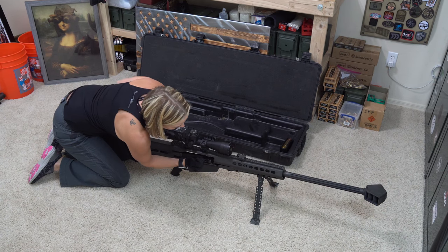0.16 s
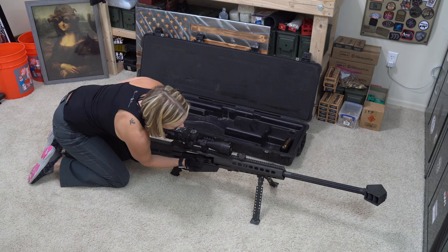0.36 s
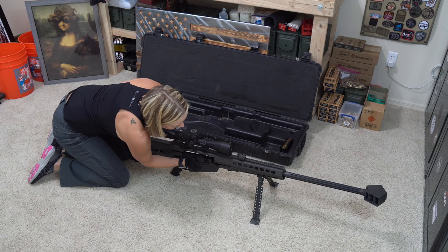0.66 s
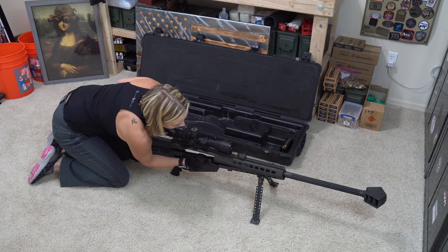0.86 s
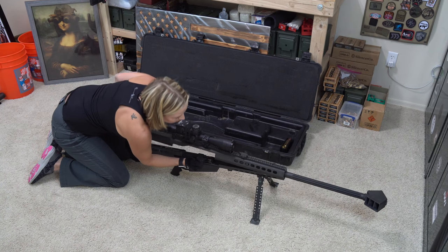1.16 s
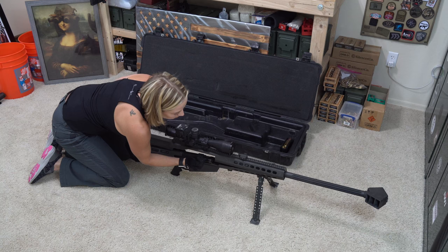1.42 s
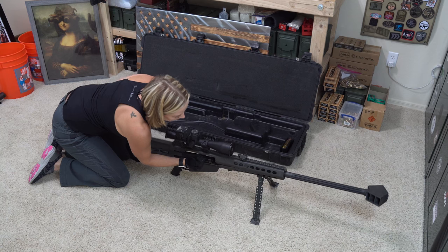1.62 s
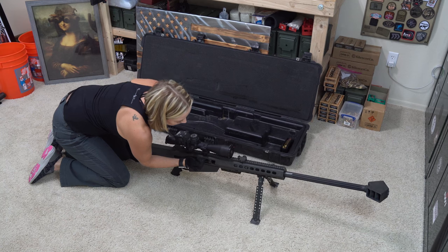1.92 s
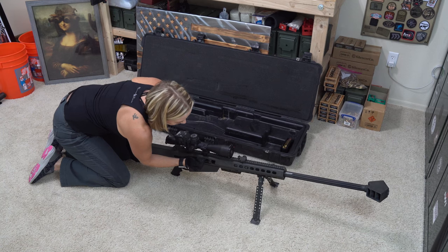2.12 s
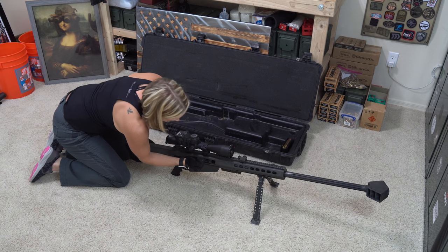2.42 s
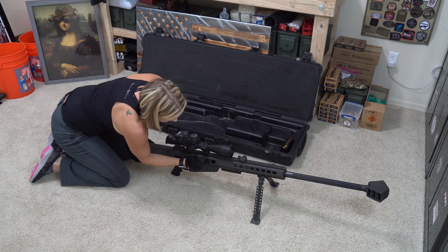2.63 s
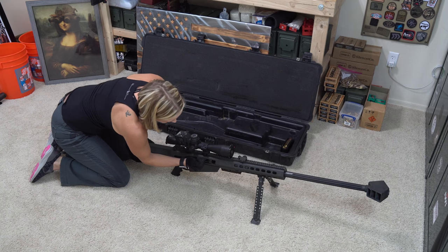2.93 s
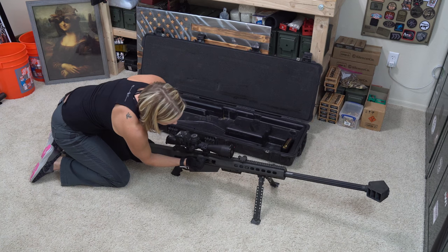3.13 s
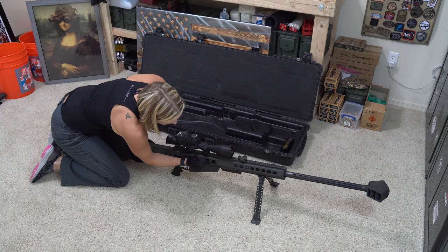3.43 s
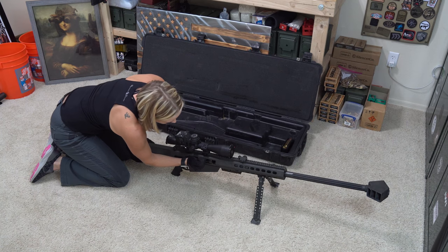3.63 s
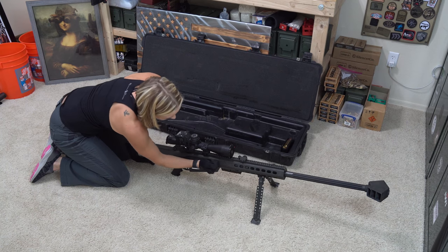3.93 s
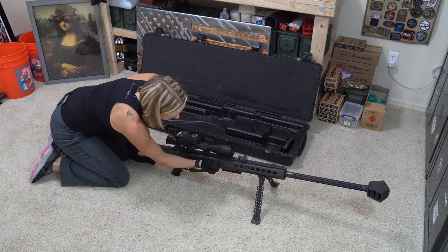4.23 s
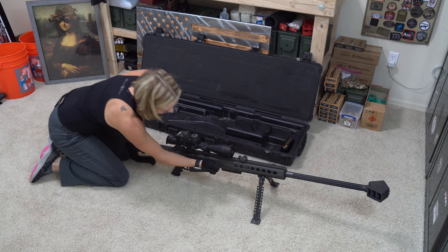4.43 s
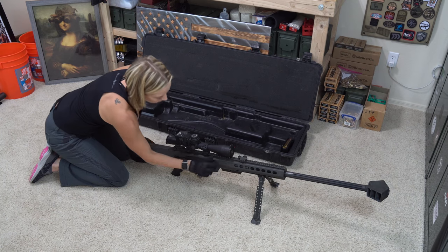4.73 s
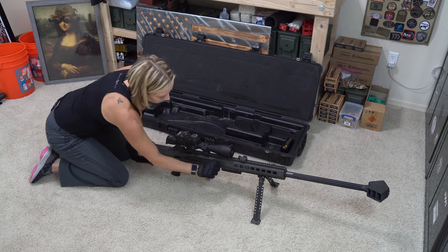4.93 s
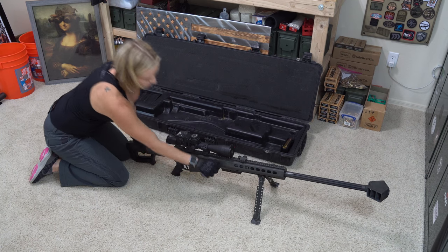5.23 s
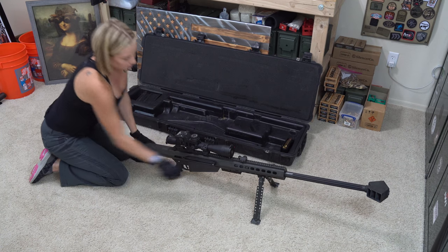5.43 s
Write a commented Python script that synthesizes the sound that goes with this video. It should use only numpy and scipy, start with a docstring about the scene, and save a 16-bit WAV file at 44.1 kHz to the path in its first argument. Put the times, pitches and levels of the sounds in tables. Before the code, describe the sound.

In a small carpeted room, a large rifle's bolt clatters, is hauled back with a hard clack, then slams home with bright ringing steel.

```python
"""A small storeroom with a carpet, where the bolt of a large rifle is worked.
Steel parts knock, slide and latch: bursts of tiny impacts excite short cracks and a decaying room wash.
The bolt is hauled back against its stop, then slams home; damped modes make the receiver ring.
Clothes rustle between the blows as swells of filtered noise, over a steady hiss.
The recorder's gain control ducks under the loud blows and recovers in two stages."""
import sys
import numpy as np
from scipy import signal
from scipy.io import wavfile
from scipy.ndimage import uniform_filter1d, minimum_filter1d

SR = 44100
rng = np.random.default_rng(int(sys.argv[2]) if len(sys.argv) > 2 else 0)


def digitize_waveform(pressure):
    """Quantize a signal to 16-bit integers and store it at the path in sys.argv[1].

    Rows of a 2-D input are taken as channels; values are limited to [-1, 1].
    """
    field = np.atleast_2d(pressure).T
    bounded = np.clip(field, -1, 1)
    quanta = np.round(bounded * 32767).astype(np.int16)
    wavfile.write(sys.argv[1], SR, quanta)


N = 245362

# spectral density of a blow on the receiver: (f/Hz, relative density/dB per Hz)
BLOW_SPECTRUM = [(40, -44.5), (90, -28), (130, -22), (170, -19.5), (260, -5), (350, -4), (550, -9),
                 (900, -10), (1600, -4.5), (2400, -5.5), (4000, -7.5), (7000, -11.5), (11000, -16),
                 (16000, -23)]
# damped resonances of the receiver's sheet steel: (f/Hz, bandwidth/Hz, emphasis/dB)
SHELL_RESONANCES = [(728, 130, 5.5), (1010, 60, 6), (1410, 89, 1), (1564, 45, 2.5), (1773, 230, 7.5),
                    (1997, 130, 3), (2611, 50, 2.5), (3116, 47, 4), (3356, 39, 4.5), (3670, 30, -3)]
# ringing modes of bolt, spring and barrel: (f/Hz, level/dB, t60/s)
STEEL_MODES = [(931, -45, 1.7), (1120, -45, 1.6), (1464, -37, 1.7), (1771, -28, 1.8), (1976, -29, 1.3),
               (2030, -7, .63), (2052, -7, .63), (2105, -26, 1.1), (2175, -32, 1.5), (3160, -13, .56),
               (3316, -32, 1.0), (4215, -41, 1.8), (3919, -16, .55), (4307, -20, .58), (4490, -11, .54),
               (6907, -14, .48), (7079, -14, .41), (7318, -13, .43), (8107, -15, .41), (8375, -5, .46),
               (9275, -11, .38), (9825, 1, .32), (10131, -13, .36), (10470, -2, .28), (10729, 0, .31),
               (11294, -8, .3), (11391, -13, .34), (11843, -11, .3), (12823, -12, .28), (13110, -10, .26)]
# spectral density of the many weaker modes that ring on together: (f/Hz, relative density/dB per Hz)
SHIMMER_SPECTRUM = [(300, -42.5), (900, -9), (1500, -7), (2050, 5.5), (2600, -10), (4400, -6.5),
                    (5500, -34), (12000, -45)]
# reverberation time of the room: (f/Hz, t60/s)
ROOM_T60 = [(100, 0.28), (300, .45), (700, 0.6), (1150, 0.63), (1600, 0.68), (2200, .58), (3200, 0.52),
            (5500, 0.49), (10000, 0.33), (16000, .27)]
# likeness of left and right: (f/Hz, correlation)
EAR_CORRELATION = [(150, .99), (330, .94), (800, .78), (1700, .63), (3500, .47), (7000, .28), (16000, .3)]
# steady hiss of room and microphone: (f/Hz, relative density/dB per Hz)
HISS_SPECTRUM = [(30, -42), (80, -29), (120, -18), (165, -27), (300, -15.5), (520, -7), (1000, -8.5),
                 (1900, -8.5), (3000, -12), (6000, -16), (12000, -17), (15500, -19.5)]
# spectral density of the rustle: (f/Hz, relative density/dB per Hz)
CLOTH_SPECTRUM = [(40, -19.5), (200, -9.5), (1800, 3), (5000, -3.5), (12000, -4.5), (16000, -14)]
# sleeves, gloves and knees on the carpet, one swell per shift of the body:
# (middle t/s, level/dB, half length/s)
BODY_SHIFTS = [(0.02, -58, 0.19), (0.552, -66.5, 0.46), (1.757, -59, 0.12), (2.47, -67, 0.2),
               (5.52, -64, 0.39)]
# knocks and small ticks as the rifle is handled or rocks on the floor:
# (t/s, level/dB, weight below 600 Hz/dB, brightness in the treble/dB, struck part f/Hz)
KNOCKS = [(0.0, -35, 0.5, -13.5, 790), (0.644, -48, -2.5, -26, 1900), (0.966, -59.5, 11, 3, 1940),
          (1.447, -59, -1, 4, 2580), (1.886, -23.5, -1.5, -18, 335), (2.406, -59.5, -3, 1, 1600),
          (3.518, -51, -14, -23.5, 1690), (4.244, -43, -9, -31, 2010), (4.951, -56.5, -8, -13, 779),
          (5.297, -47.5, 2.5, -9, 753)]
# the bolt slides in its rails:
# (start t/s, length/s, final level/dB, swell/dB, weight/dB, brightness/dB, f/Hz, ring/dB)
SLIDES = [(1.098, .07, -42, 21.5, -13, -4, 3100, -16), (1.335, .18, -56.5, 1, -3.5, -11.5, 2900, 0),
          (3.865, .04, -48.5, 3.5, -18.5, 7, 1750, -28.5), (3.916, .034, -19.5, 4.5, -19, -3, 790, -28.5)]
# the bolt runs into a stop and rattles:
# (t/s, level/dB, weight/dB, brightness/dB, f/Hz, first gap/s, added brightness of the first touch/dB)
STOPS = [(1.166, -37, 4, -4, 1904, .0095, -4.5), (1.825, -15.5, -4.5, -2.5, 1384, .012, 10)]
# single blows of the bolt: it breaks free, is let go, meets the breech, slams home:
# (t/s, level/dB, weight/dB, brightness/dB, f/Hz, ring/dB)
BLOWS = [(1.7707, -12, -16.5, -5.5, 1530, -13.5), (3.847, -41, -11.5, 1.5, 5400, -30),
         (3.907, -23, -18.5, -18, 1530, -24.5), (3.956, -11, -10.5, 17.5, 10500, 9)]

TIME = np.arange(N) / SR   # s
BAND_EDGES = np.geomspace(28, 17000, 26)   # Hz
BAND_CENTRES = np.sqrt(BAND_EDGES[1:] * BAND_EDGES[:-1])   # Hz

HISS_DB, STILL_CLOTH_DB = -63.5, -76   # the second is the cloth between shifts
LEFT_DB = -0.67   # the right channel is raised by as much
KNOCK_CHATTER_S, KNOCK_RING_DB = .0052, -10.5
STOP_CHATTER_S, STOP_RING_DB = .004, -6.5
BLOW_CHATTER_S = .004
EDGE_HZ, EDGE_DB = 3150, -4   # the light edge that touches a stop first
GAP_GROWTH, REBOUND_LOSS_DB, REBOUND_DULLING_DB = 1.6, 5, 1   # per rebound
STIR_S = .028   # correlation time of the reflections that stir the ringing
LIMIT_DB = -15.5   # power above which the gain is turned down
FAST_RETURN, SLOW_RETURN = 170, 3.5   # dB per s
CUTOFF_HZ = 15950


def from_db(db):
    """Logarithmic level: twenty decibels are a factor of ten in amplitude."""
    return 10 ** (np.asarray(db) / 20)


def rms(x):
    """Root mean square: the square root of the mean power."""
    return np.sqrt(np.mean(x ** 2) + 1e-20)


def at_hz(points, hz):
    """Interpolation along a logarithmic frequency axis."""
    known_hz, values = np.transpose(points)
    return np.interp(np.log(hz), np.log(known_hz), values)


def noise_bands(spectrum, size, likeness=1):
    """Interaural correlation: shared and opposed noise are mixed per band; axes (band, channel, sample)."""
    white = rng.standard_normal((2, 2, size))
    bands = []
    for k, hz in enumerate(BAND_CENTRES):
        band_pass = signal.butter(2, BAND_EDGES[k:k + 2], "band", fs=SR, output="sos")
        mid, side = signal.sosfilt(band_pass, white[k % 2])   # neighbouring bands use different noise
        alike = np.clip(likeness * at_hz(EAR_CORRELATION, hz), 0, 1)
        mid = np.sqrt(1 + alike) * mid
        side = np.sqrt(1 - alike) * side
        bands.append(from_db(at_hz(spectrum, hz)) * np.array([mid + side, mid - side]))
    return np.array(bands)


def resonance(x, hz, width_hz):
    """Damped resonance: a pole pair whose radius sets the bandwidth, with gain 1 at its peak."""
    r = np.exp(-np.pi * width_hz / SR)
    zeros = np.array([1, 0, -1]) * (1 - r * r) / 2
    poles = [1, -2 * r * np.cos(2 * np.pi * hz / SR), r * r]
    return signal.lfilter(zeros, poles, x)


def emphasise(x, hz, width_hz, db):
    """Superposition: a resonance added to its own excitation changes the level at its peak by db."""
    return x + (from_db(db) - 1) * resonance(x, hz, width_hz)


def hiss():
    """Stationary random noise: nearly independent in the two ears, as from all around."""
    noise = noise_bands(HISS_SPECTRUM, size=N, likeness=0.044).sum(axis=0)
    return from_db(HISS_DB) * noise / rms(noise)


def rustling():
    """Amplitude modulation: the gain of the cloth swells in one bell for each shift of the body."""
    gain = from_db(STILL_CLOTH_DB)
    for s, db, half_s in BODY_SHIFTS:
        gain = gain + from_db(db) * np.exp(-((TIME - s) / half_s) ** 2)
    return gain


def cloth():
    """Friction noise: broadband noise of cloth follows the movement of the body."""
    noise = noise_bands(CLOTH_SPECTRUM, size=N, likeness=0.51).sum(axis=0)
    return rustling() * noise / rms(noise)


def knocks():
    """Single impact: each knock is one contact, dull or bright by its row."""
    return [(*knock, KNOCK_CHATTER_S, KNOCK_RING_DB) for knock in KNOCKS]


def contact_colour(hz, weight_db, bright_db, low_hz=600, high_hz=4200):
    """Contact stiffness and mass: heavy contacts add bass, hard ones add treble; in dB."""
    bass_db = weight_db / (1 + (hz / low_hz) ** 2)
    treble_db = bright_db / (1 + (high_hz / hz) ** 2)
    return bass_db + treble_db


def chatter(length_s, uneven_db=5.5, touch_s=0.0034):
    """Multiple impact: a touch, then tiny random rebounds; longer ones scrape more. Energy 1."""
    t = TIME[:SR // 6]
    occurs = rng.random(len(t)) < 3000 / SR   # 3000 rebounds per s on average
    rebounds = rng.standard_normal(len(t)) * occurs
    rebounds *= from_db(uneven_db * rng.standard_normal(len(t)))
    rebounds *= np.sqrt(t) * np.exp(-t / length_s)
    force = rebounds / (np.linalg.norm(rebounds) + 1e-12)
    force[0] += touch_s / length_s
    return force / np.linalg.norm(force)


def clacks(contacts, crack_db=-1, crack_s=0.011, part_db=7, part_width=0.2):
    """Convolution of force and response: a short crack, and a room wash that dies band by band."""
    t = TIME[:SR]
    wash = from_db(-60 * t / at_hz(ROOM_T60, BAND_CENTRES)[:, None, None])
    crack = from_db(crack_db) * np.exp(-t / crack_s)
    response = noise_bands(BLOW_SPECTRUM, size=SR) * (wash + crack)
    response /= rms(response.sum(axis=0)[:, :SR // 25])   # reference: the first 40 ms
    out = np.zeros((2, N + 2 * SR))
    for s, db, weight_db, bright_db, part_hz, chatter_s, _ in contacts:
        band_db = db + contact_colour(BAND_CENTRES, weight_db, bright_db)
        coloured = np.tensordot(from_db(band_db), response, 1)
        force = emphasise(chatter(chatter_s), part_hz, part_width * part_hz, part_db)
        blow = signal.fftconvolve(coloured, force[None], axes=1)
        start = max(round(s * SR), 0)
        out[:, start:start + blow.shape[1]] += blow
    return out[:, :N]


def shell(x, plain_db=-3.0):
    """Wall resonance: the receiver's walls colour a few pitches of each clack."""
    for hz, width_hz, db in SHELL_RESONANCES:
        x = emphasise(x, hz, width_hz, db)
    return from_db(plain_db) * x


def ringing(contacts, echo_db=-1, swell_s=0.0024):
    """Modal vibration: contacts excite decaying modes, which reflections stir differently at each ear."""
    s, db, _, bright_db, _, _, ring_db = np.transpose(contacts)
    at = np.maximum(np.round(s * SR), 0).astype(int)
    out = np.zeros((2, N))
    knots = np.arange(0, 6, 1 / 120)   # times in s at which the reflections are drawn
    stir_memory = np.exp(-knots[1] / STIR_S)
    for hz, mode_db, t60 in STEEL_MODES:
        # the hardest contact wakes the high modes fully, softer ones less
        hardness_db = contact_colour(hz, 0, bright_db - bright_db.max())
        clicks = np.full(N, 1e-18)
        clicks[at] = from_db(db + ring_db + mode_db + hardness_db)
        turn = np.exp(2j * np.pi * hz / SR)
        dying = from_db(-60 / (t60 * SR)) * turn
        rising = np.exp(-1 / (swell_s * SR)) * turn
        tone = signal.lfilter([0, dying - rising], [1, -dying - rising, dying * rising], clicks)
        # modes that outlast the room stand steadier
        echo = from_db(echo_db) * min(at_hz(ROOM_T60, hz) / t60, 1)
        phase = 2 * np.pi * rng.random()
        # the less alike the ears, the further apart their phases
        apart = rng.choice([-1, 1]) * np.arccos(np.clip(at_hz(EAR_CORRELATION, hz), 0, 1))
        for ear in range(2):
            steps = rng.standard_normal((len(knots), 2)) @ [1, 1j]
            stir = signal.lfilter([1], [1, -stir_memory], steps)
            path = np.exp(1j * (phase + ear * apart)) + echo * stir / rms(abs(stir))
            out[ear] += (tone * np.interp(TIME, knots, path)).real / np.hypot(1, echo)
    return out


def shimmer(contacts, level_db=-24, t60=1.305):
    """High modal density: weak modes too many to tell apart blur into one metallic afterglow."""
    s, db, *_, ring_db = np.transpose(contacts)
    at = np.maximum(np.round(s * SR), 0).astype(int)
    clicks = np.zeros((1, N))
    clicks[0, at] = from_db(db + ring_db + level_db)
    noise = noise_bands(SHIMMER_SPECTRUM, size=2 * SR).sum(axis=0)
    glow = noise / rms(noise) * from_db(-60 * TIME[:2 * SR] / t60)
    return signal.fftconvolve(clicks, glow, axes=1)[:, :N]


def slide(s, length_s, db, swell_db, weight_db, bright_db, pitch_hz, ring_db, count=6):
    """Sliding friction: uneven catches scrape on in turn, louder as the bolt gathers speed."""
    travel = (np.arange(count) + .5 * rng.random(count)) / count   # fraction of the slide's length
    rows = []
    for u in travel:
        catch_db = db - swell_db * (1 - u)
        rows.append((s + u * length_s, catch_db, weight_db, bright_db, pitch_hz, length_s / count, ring_db))
    return rows


def rattle(s, db, weight_db, bright_db, pitch_hz, gap_s, edge_bright_db, count=3):
    """Inelastic rebound: an edge touches, the mass lands and rocks, each time later, weaker and duller."""
    edge_bright = bright_db + edge_bright_db
    rows = [(s, db + EDGE_DB, weight_db, edge_bright, EDGE_HZ, STOP_CHATTER_S, STOP_RING_DB)]
    for k in range(count):
        s = s + gap_s * GAP_GROWTH ** k
        struck_hz = EDGE_HZ if k % 2 else pitch_hz   # mass and edge take turns
        landing_db = db - k * REBOUND_LOSS_DB
        landing_bright = bright_db - k * REBOUND_DULLING_DB
        rows.append((s, landing_db, weight_db, landing_bright, struck_hz, STOP_CHATTER_S, STOP_RING_DB))
    return rows


def blows():
    """Single impact: each blow of the bolt is one contact with its own share of ringing."""
    return [(*blow, BLOW_CHATTER_S, ring_db) for *blow, ring_db in BLOWS]


def steel_contacts():
    """Excitation by contact: (t/s, level/dB, weight/dB, brightness/dB, f/Hz, chatter/s, ring/dB)."""
    rows = knocks()
    for stroke in SLIDES:
        rows += slide(*stroke)
    for stop in STOPS:
        rows += rattle(*stop)
    return rows + blows()


def scene():
    """Level difference between the ears: the rifle is heard a little to the right."""
    contacts = steel_contacts()
    rifle = shell(clacks(contacts)) + ringing(contacts) + shimmer(contacts)
    return rifle * from_db([[LEFT_DB], [-LEFT_DB]]) + hiss() + cloth()


def released(over_db, db_per_s):
    """Peak following: a level is met at once and let go at a steady rate."""
    fall_db = db_per_s * TIME
    return np.maximum.accumulate(over_db + fall_db) - fall_db


def gain_control(x, slow_share=0.39):
    """Level limiting: ducks loud blows about 3 ms ahead; most gain returns fast, the rest creeps back."""
    power = np.maximum(uniform_filter1d(np.mean(x ** 2, axis=0), size=128), 1e-14)
    over_db = np.maximum(10 * np.log10(power) - LIMIT_DB, 0)
    over_db = -minimum_filter1d(-over_db, size=300)   # running maximum, to look ahead
    fast_db = released(over_db, FAST_RETURN)
    slow_db = released(slow_share * over_db, SLOW_RETURN)
    duck_db = np.maximum(fast_db, slow_db)
    return x * from_db(-uniform_filter1d(duck_db, size=48))


def record(dry):
    """Band limitation: after the gain control, a steep low-pass cuts the top."""
    low_pass = signal.ellip(12, .1, 80, CUTOFF_HZ, fs=SR, output="sos")
    return signal.sosfilt(low_pass, gain_control(dry))


dry = scene()
out = record(dry)
digitize_waveform(out)
```